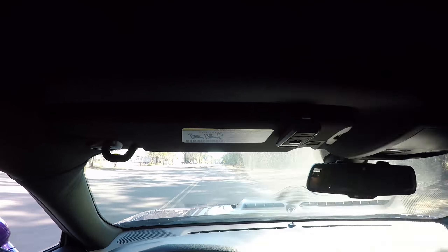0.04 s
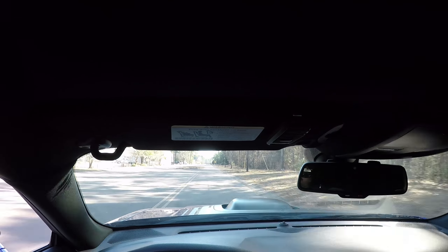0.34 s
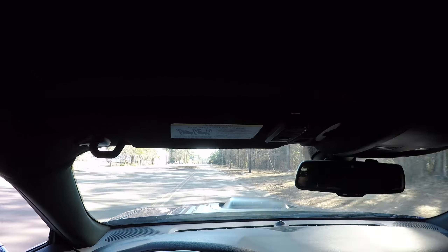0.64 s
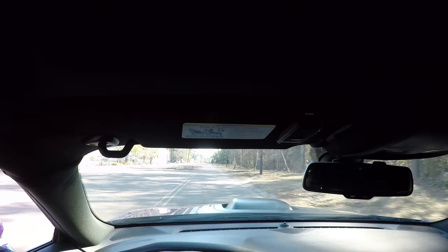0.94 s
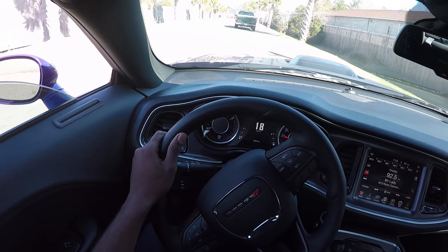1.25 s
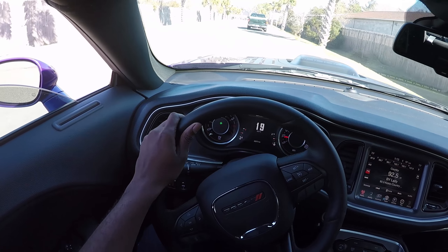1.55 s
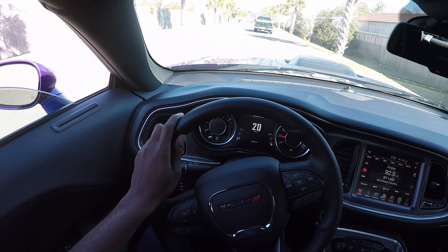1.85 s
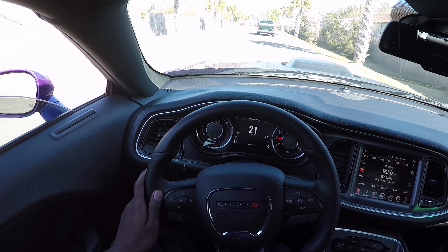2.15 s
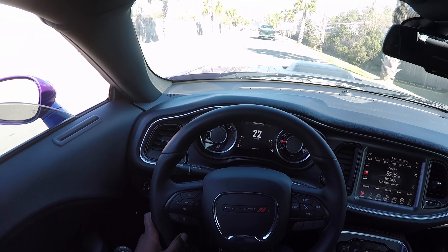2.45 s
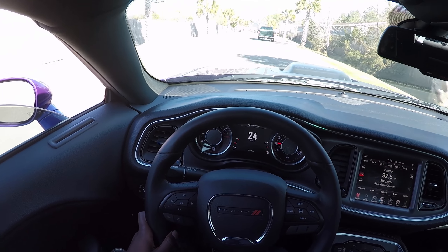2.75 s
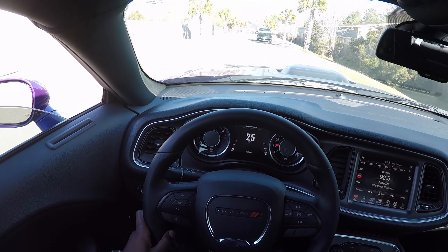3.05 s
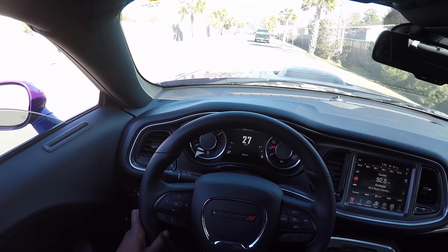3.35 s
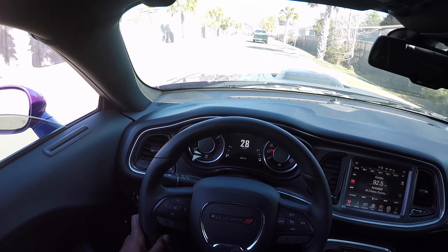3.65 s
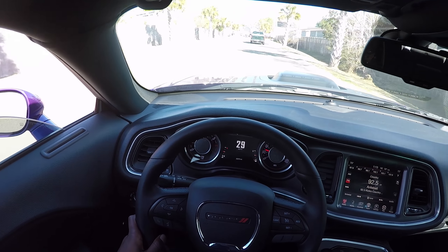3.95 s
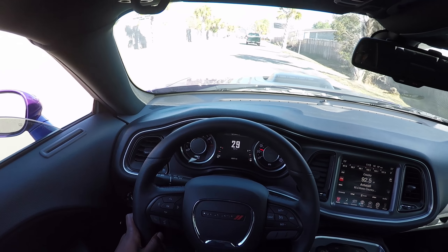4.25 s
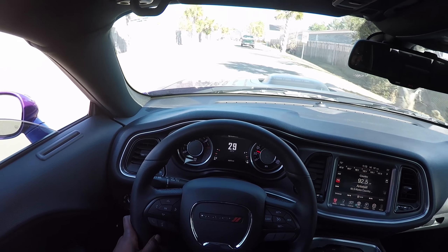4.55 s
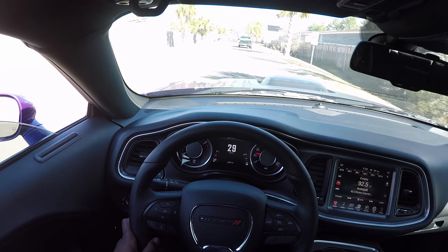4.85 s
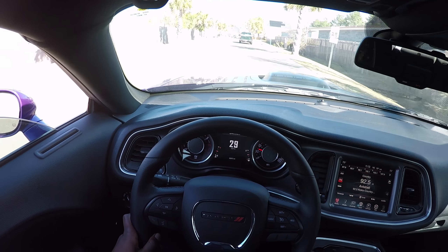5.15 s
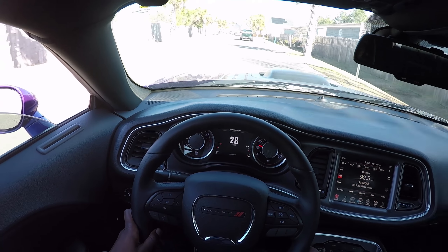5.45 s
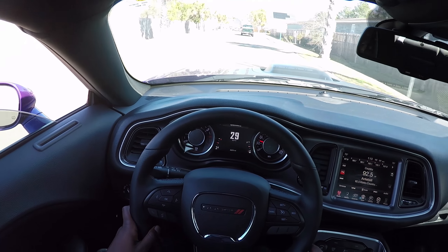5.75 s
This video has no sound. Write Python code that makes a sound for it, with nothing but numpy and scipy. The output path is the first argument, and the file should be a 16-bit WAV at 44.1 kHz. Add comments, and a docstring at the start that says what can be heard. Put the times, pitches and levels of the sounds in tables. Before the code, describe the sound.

A loud V8 car heard from inside cruises, then after an abrupt cut accelerates with a booming growl, eases off, shifts up and drones on.

```python
"""A loud V8 car booms and growls, heard from inside. It cruises on a coarse road; then, after an
abrupt cut, it pulls from low revs, lifts off, shifts up and drones on. The firing cylinders make a
boom that swells as it passes the cabin's resonances (pitches at which the cabin rings). Uneven
firing in the two cylinder banks adds burble and growl. Gas rasps in the pipes and the intake, the
exhaust sputters with the throttle shut, tyres rumble and bits of trim tick."""
import sys
import numpy as np
from scipy import signal
from scipy.fft import rfft, irfft
from scipy.io import wavfile
from scipy.ndimage import uniform_filter1d

SR = 44100
rng = np.random.default_rng(int(sys.argv[2]) if len(sys.argv) > 2 else 0)


def put_to_file(sound):
    """Save the sound as 16-bit audio at rate SR, in the file named by the first command-line argument."""
    columns = np.atleast_2d(sound).T  # one column per channel
    safe = np.clip(columns, -1, 1)
    whole_steps = np.round(safe * 32767)
    wavfile.write(sys.argv[1], SR, whole_steps.astype(np.int16))


N = 260190
TIME, BINS = np.arange(N) / SR, np.fft.rfftfreq(N, 1 / SR)  # each sample [s], each frequency [Hz]
CUT_S = 1.114  # the cruise ends here
LOW_SPEED = 17.2  # low revs [cycles/s]; in one cycle all eight cylinders fire once

# engine speed: (time [s], speed [cycles/s])
SPEED = [(1.12, 14.93), (1.3, 15.1), (1.95, 17.2), (2.6, 19.72), (2.97, 21.15), (3.35, 22.5), (3.56, 23.35),
         (3.76, 23.55), (3.87, 23.95), (3.99, 23.76), (4.32, 21.4), (4.52, 19.3), (4.83, 15.75),
         (5.0, 15.55), (5.12, 16.45), (5.3, 16.75), (5.46, 16.22), (5.89, 16.78)]
# cabin and pipe resonances: (pitch [Hz], width [Hz], boost [dB])
PIPE_PEAKS = [(195.5, 24, 4), (227, 16, -9), (365, 20, -2), (386, 8, -5.5), (458, 49, 2), (490, 17, 2),
              (572, 43, 9.5), (654.6, 29, 7), (1227, 17, 6.5), (1990, 130, 4.5), (3600, 220, 2.5)]
# how the pipes ring with the throttle shut: (pitch [Hz], width [Hz], boost [dB])
COAST_PEAKS = [(115, 8, 4), (238, 18, 9), (306, 16, 7), (372, 20, 5)]


def exhaust(speed, cycles, overtones_db=1.58):
    """Eight firings a cycle make the boom; uneven spacing in each bank adds the other tones."""
    # a tone's order is its pitch divided by the engine speed
    # tone strengths: (order, light throttle [dB], pulling hard [dB], coasting [dB])
    orders = [(3, 1.5, 7.5, 9), (4, -15, 3, -11.5), (5, -2, -13, -2), (6, 4.5, 6.5, 6.5), (7, 0, 2.5, 3),
              (9, 3.5, 15.5, 9), (10, 1, 13.5, 6), (11, 10, 6.5, -2), (12, 2, 7.5, 1.5), (13, 6.5, -0.5, 6),
              (14, 6.5, 12, 6.5), (15, 4, 8.5, 1), (16, 7, 9.5, 4), (17, 8.5, 5.5, -4.5), (18, 2, 5, 1.5),
              (19, 9, 7, 6)]
    # the highest tones, one strength for any throttle: (order, strength [dB])
    upper_orders = [(20, 3.5), (21, -2), (22, 7), (23, 5.5), (24, 0), (25, -1), (26, 2.5), (27, -5),
                    (28, -5.5), (29, -4.0), (30, -0.5), (31, -5.5), (32, -2.5)]
    # relative levels of the tones: (time [s], burble below order 13 [dB], growl from 13 up [dB])
    group_levels = [(1.15, -54.5, -50), (1.6, -57.5, -52), (2.15, -53, -47.5), (2.45, -48, -45.5),
                    (2.75, -48.5, -44.5), (3.05, -49.5, -41), (3.3, -44.5, -40), (3.72, -48.5, -37.5),
                    (3.92, -47.5, -52), (4.12, -46, -42.5), (4.35, -45, -49), (4.6, -45.5, -49),
                    (4.95, -54, -50.5), (5.2, -52, -58), (5.45, -54, -50.5), (5.75, -57, -45.5)]
    # cabin resonances that lift the boom: (pitch [Hz], width [Hz], boost [dB])
    boom_peaks = [(129, 86, 13.5), (173.7, 4.9, 5.5), (187.6, 7.9, 9.5)]
    # the boom dips and swells as the revs peak and fall, then sinks at the gear change:
    # (time [s], change [dB])
    boom_dips = [(3.7, 1), (3.81, -4.5), (3.95, 1.5), (4.1, -4), (4.3, 1), (4.42, -5), (4.55, -2.5),
                 (4.72, -5), (4.9, 0.5), (5.03, 0), (5.13, -9.5), (5.9, 0)]
    boom_db = engine_level(light_db=-34, pull_db=-4.5, coast_db=-2.5)
    boom_db += resonance_db(boom_peaks, 8 * speed) + curves(boom_dips)[0]
    boom_flutter = 0.0085 + 0.012 * np.maximum(speed - LOW_SPEED, 0)  # more at high revs
    out = amp(boom_db) * engine_tone(cycles, order=8, depth=boom_flutter).real
    pull, coast = load()
    burble_db, growl_db = curves(group_levels)
    for order, light, hard, shut in list(orders) + [(k, db, db, db) for k, db in upper_orders]:
        hz = order * speed
        group_db, flutter = (burble_db, 0.24) if order < 13 else (growl_db, 0.2)
        flutter = flutter + 0.08 * (1 - pull)  # fuel burns more steadily when pulling
        coast_db = shut - light + resonance_db(COAST_PEAKS, hz)
        throttle_db = light + pull * (hard - light) + coast * coast_db
        # each tone swells and fades as the revs carry it through the resonances
        tone = cabin_response(hz) * engine_tone(cycles, order, flutter)
        out += amp(overtones_db + group_db + throttle_db) * tone.real
    right_ear = np.roll(out, 7)  # 7 samples later than the left
    return place(np.array([out, right_ear]), left_db=.7)


def engine_tone(cycles, order, depth):
    """One tone, fluttering in strength and phase; its real part is the sound."""
    flutter = 1 + depth * (wander(rate_hz=3) + 1j * wander(rate_hz=3))
    same_power = np.sqrt(2 / (1 + 2 * depth ** 2))
    return same_power * flutter * np.exp(2j * np.pi * (order * cycles + rng.random()))


def cruise(drone_hz=121.3, between_db=-35, rumble_db=-26, tyres_db=-41):
    """A lumpy exhaust drone swells amid the rumble and roar of tyres on coarse asphalt."""
    # swells of the drone: (middle [s], half length [s], level [dB])
    surges = [(0.087, 0.026, -23.5), (0.257, 0.036, -27.5), (0.523, 0.071, -28), (0.735, 0.045, -35),
              (1.057, 0.031, -25)]
    # tone colour of the rumble: (frequency [Hz], relative level [dB])
    rumble_spectrum = [(10, -18), (22, 6.5), (40, 1), (75, 1), (115, -1.5), (157, -7), (190, -0.5),
                       (230, -13), (310, -10.5), (400, -21), (520, -26.5), (900, -76.5)]
    # tone colour of the tyre roar: (frequency [Hz], relative level [dB])
    tyre_spectrum = [(260, -7.5), (400, 3), (520, -3), (800, -0.5), (1100, -5.5), (1400, -12.5),
                     (1700, -10.5), (2000, -19), (2400, -19), (3000, -27.5), (4400, -32), (6600, -30.5),
                     (8200, -44), (10300, -46.5), (12000, -71)]
    # tyre and body resonances: (pitch [Hz], width [Hz], boost [dB])
    tyre_peaks = [(655, 24, 7.5), (892, 54, 7), (1357, 200, 8), (2190, 180, 5)]
    turns = np.cumsum(drone_hz + 4 * wander(rate_hz=14)) / SR
    lumps = unit(1 + .3 * wander(rate_hz=16))
    swells = sum(amp(db) * np.exp(-2 * ((TIME - s) / half) ** 2) for s, half, db in surges)
    drone = (amp(between_db) + swells) * lumps * np.sqrt(2) * np.sin(2 * np.pi * turns)
    tyres = amp(tyres_db + wander(rate_hz=22)) * noise(tyre_spectrum, tyre_peaks)
    return place(drone, left_db=2) + amp(rumble_db) * noise(rumble_spectrum) + tyres


def sputter(cycles, spread_db=4, low_hz=170, high_hz=480):
    """With the throttle shut, firings of very uneven strength thud through pipes and cabin."""
    # loudness of the misfiring: (time [s], level [dB])
    levels = [(3.7, -61.5), (3.82, -39), (3.96, -47), (4.07, -39), (4.36, -36), (4.5, -45), (4.75, -44),
              (5.0, -48), (5.12, -55)]
    fires = np.diff(np.floor(8 * cycles), prepend=0) > 0
    strength = amp(spread_db * np.clip(rng.standard_normal(N), -2, 2))
    pulses = fires * (strength - strength.mean())
    band = BINS ** 2 / (BINS ** 2 + low_hz ** 2) / (1 + (BINS / high_hz) ** 6)
    ringing = amp(resonance_db(COAST_PEAKS, BINS)) * cabin_response(BINS)
    thuds = unit(irfft(rfft(pulses) * band * ringing, N))
    return place(amp(curves(levels)[0]) * thuds, left_db=-1)


def pipe_rasp(cycles):
    """Gas leaves the pipes in puffs, one a firing; when pulling, more of it repeats every cycle."""
    # loudness of the gas flow: (time [s], level [dB])
    levels = [(1.15, -46.5), (1.85, -47.5), (2.27, -45.5), (2.5, -45.5), (2.75, -41), (3.15, -39.5),
              (3.4, -42), (3.62, -39), (3.95, -44.5), (4.25, -42), (4.5, -44), (5.25, -46.5), (5.85, -44.5)]
    # its tone colour: (frequency [Hz], relative level [dB])
    spectrum = [(100, -26.5), (200, -6.5), (330, 6), (450, 2), (560, -7.5), (780, -1.5), (1050, -6.5),
                (1300, -9.5), (1650, -14.5), (2100, -22), (2800, -28), (4000, -33), (6000, -51.5),
                (9000, -56.5)]
    one_cycle = rng.standard_normal((2, 2048))
    repeating = unit(np.array([np.interp(cycles % 1, np.arange(2048) / 2048, c) for c in one_cycle]))
    share = .06 + .45 * load()[0]
    gas = np.sqrt(share) * repeating + np.sqrt(1 - share) * rng.standard_normal((2, N))
    puffs = unit(1 + .17 * np.cos(2 * np.pi * 8 * cycles))
    return amp(curves(levels)[0]) * puffs * colour(gas, spectrum, PIPE_PEAKS)


def intake(cycles, depth=.22):
    """Air is gulped past the open throttle, once for each cylinder."""
    # the rasp as the throttle opens: (time [s], level [dB])
    levels = [(2.1, -85), (2.28, -55), (2.36, -64), (2.45, -60), (2.55, -62), (2.68, -53), (2.9, -57.5),
              (3.2, -57), (3.4, -65.5), (3.68, -55), (3.85, -84.5)]
    # its tone colour: (frequency [Hz], relative level [dB])
    spectrum = [(700, -26), (1300, 4.5), (1900, -5.5), (2400, -9.5), (2900, -9.5), (3500, -13),
                (5000, -27.5), (9000, -61)]
    gulps = unit(1 + depth * np.cos(2 * np.pi * 8 * cycles))
    return amp(curves(levels)[0]) * gulps * noise(spectrum)


def road(rumble_boost_db=2):
    """The body rumbles over the road; air hisses round the cabin, more as the revs rise."""
    # loudness of the rumble: (time [s], relative level [dB])
    levels = [(1.15, -48), (1.55, -49), (2.25, -39.5), (2.75, -30.5), (3.1, -31.5), (3.4, -38),
              (3.8, -37.5), (4.2, -32), (4.48, -35.5), (5.1, -35), (5.35, -33), (5.9, -32.5)]
    # tone colour of the rumble: (frequency [Hz], relative level [dB])
    rumble_spectrum = [(10, -7.5), (20, 3), (40, 11.5), (60, -0.5), (85, 2.5), (120, 1), (200, -4),
                       (300, -8), (420, -20), (700, -70.5)]
    # tone colour of the hiss: (frequency [Hz], relative level [dB])
    hiss_spectrum = [(1000, -15.5), (2500, -0.5), (3100, -4.5), (3600, -0.5), (4800, -5.5), (6400, -6),
                     (7300, -10.5), (8200, -15.5), (10500, -21.5), (12000, -51.5), (16000, -78)]
    rumble = amp(curves(levels)[0] + rumble_boost_db) * noise(rumble_spectrum)
    hiss_db = engine_level(light_db=-68, pull_db=-1.6, coast_db=-2.5, db_per_speed=0.5)
    return rumble + amp(hiss_db) * noise(hiss_spectrum)


def trim_ticks(ring_width_hz=400, rise_s=0.0023, fade_60db_s=0.044):
    """Small hard parts chatter: a short bright ring mixed with a broad clack."""
    # the ticks: (time [s], relative level [dB], ring pitch [Hz], share of clack [0-1])
    ticks = [(1.216, -43.5, 5270, 0.25), (1.248, -52.5, 3960, 0.4), (1.371, -53.5, 5890, 0.03),
             (1.548, -55.5, 5370, 0.8), (1.894, -45.5, 5400, 0.1), (1.998, -42.5, 6230, 0.6),
             (2.009, -44, 6300, .9), (2.038, -48, 5470, 0.9), (2.065, -52, 6250, 1),
             (2.084, -53.5, 6020, 0.7), (2.112, -55, 6600, 0.8), (4.129, -52.5, 5470, 0.1),
             (4.223, -53, 5950, 0.05), (4.317, -53.5, 6240, 0.5), (4.918, -62, 4880, .3)]
    # tone colour of the clack: (frequency [Hz], relative level [dB])
    clack_spectrum = [(800, -17.5), (2400, 2), (3700, -2), (4500, -3), (6500, -5.5), (8200, -21),
                      (12000, -26), (15000, -53)]
    # resonances of the trim: (pitch [Hz], width [Hz], boost [dB])
    clack_peaks = [(2600, 300, 3), (3700, 350, 4.6), (5160, 370, 6.1), (6200, 320, 3.8)]
    out, size = np.zeros((2, N)), SR // 5
    clack = noise(clack_spectrum, clack_peaks)
    t, hz = np.arange(size) / SR, np.fft.rfftfreq(size, 1 / SR)
    fade = (1 - np.exp(-t / rise_s)) * amp(-60 * t / fade_60db_s)
    for s, db, ring_hz, share in ticks:
        at = slice(round(s * SR), round(s * SR) + size)
        band = 1 / (1 + (2 * (hz - ring_hz) / ring_width_hz) ** 2)
        ring = unit(irfft(rfft(rng.standard_normal((2, size))) * band, size))
        tick = np.sqrt(1 - share) * ring + np.sqrt(share) * clack[:, at]
        out[:, at] += place(amp(db) * fade * tick, left_db=-1.5)
    return out


def cut_click(step_db=-18, settle_s=0.0015):
    """A click at the cut: a small step that settles at once."""
    return amp(step_db) * (TIME >= CUT_S) * np.exp(-abs(TIME - CUT_S) / settle_s)


def load():
    """How hard the engine pulls and how far it coasts, each 0-1."""
    # the pedal: (time [s], throttle [-1 coasting, 0 light, 1 pulling hard])
    pedal = [(1.1, -0.16), (1.95, 0.12), (2.3, 0.79), (3.7, 0.63), (3.9, -0.48), (4.75, -0.93), (5.1, -1.3),
             (5.6, -0.37), (5.9, 0.35)]
    throttle = np.clip(curves(pedal)[0], -1, 1)
    return np.maximum(throttle, 0), np.maximum(-throttle, 0)


def engine_level(light_db, pull_db, coast_db, db_per_speed=0):
    """A level in dB: its value at light throttle, shifted by pulling, coasting and revs."""
    pull, coast = load()
    return light_db + pull_db * pull + coast_db * coast + db_per_speed * (curves(SPEED)[0] - LOW_SPEED)


def cabin_response(hz, ripple_db=2.5):
    """How pipes and cabin change a tone's strength and phase (wave timing), as a complex gain."""
    # their peaks and notches: (frequency [Hz], gain [dB])
    gains = [(50.0, -18.5), (70.0, 4), (85.0, 9), (100.0, 5), (118.0, 9.5), (135.0, 7), (150.0, 4.5),
             (165.0, 6), (182.0, 0), (200.0, 7), (218.0, -3), (236.0, -1.5), (252.0, -0.5), (268.0, -3),
             (288.0, -6), (312.0, -6.0), (332.0, -11.5), (352.0, -6.5), (367.0, -15.5), (378.0, -14.5),
             (396.0, -17.5), (415.0, -10.5), (432.0, -24), (457.0, -10.5), (490.0, -23), (545.0, -19),
             (578.0, -11.5), (620.0, -22), (655.0, -16.5), (780.0, -24)]
    grid_hz = np.arange(1025)
    # random ripples stand for the many small cabin resonances above the boom
    bumps = np.clip(rng.standard_normal(len(grid_hz[::16])), -1.5, 1.5)
    ripple = np.interp(grid_hz, grid_hz[::16], bumps) * np.interp(grid_hz, [200, 300], [0, 1])
    db = read(gains, grid_hz) + ripple_db * ripple
    mirrored = np.log(amp(np.r_[db, db[-2:0:-1]]))
    phase = -signal.hilbert(mirrored).imag[:len(grid_hz)]  # turns at every peak and notch
    return np.interp(hz, grid_hz, amp(db) * np.exp(1j * phase))


def colour(pair, spectrum, peaks=()):
    """Two white noises become cabin sound: alike at both ears in the bass, spread out in the treble."""
    # how alike the ears are: (frequency [Hz], likeness [0-1])
    likeness = [(30, .94), (125, .97), (300, .975), (450, .8), (700, .48), (1400, .42), (3000, .25),
                (6000, .08), (10000, .5)]
    # how much louder the left ear is: (frequency [Hz], left minus right [dB])
    balance = [(30, 3.6), (80, 1.8), (160, .8), (350, .6), (700, 3.2), (1400, 4.2), (2800, 5.5), (5500, .5),
               (10000, -2.5)]
    # how far the left ear is ahead: (frequency [Hz], phase [radians])
    lead = [(30, 0), (260, -.05), (520, .3), (1200, .4), (1700, .7), (2700, 1.6), (6000, 0)]
    common, separate = rfft(pair)
    same, lean_db = np.clip(read(likeness, BINS), -1, 1), read(balance, BINS) / 2
    left = common * amp(lean_db) * np.exp(1j * read(lead, BINS))
    right = (same * common + np.sqrt(1 - same ** 2) * separate) * amp(-lean_db)
    out = irfft(np.array([left, right]) * amp(read(spectrum, BINS) + resonance_db(peaks, BINS)), N)
    return out / np.std(out.mean(0))


def noise(spectrum, peaks=()):
    """Stereo cabin noise with the given tone colour."""
    return colour(rng.standard_normal((2, N)), spectrum, peaks)


def resonance_db(peaks, hz):
    """The boost that a set of resonances gives at hz."""
    return sum(db / (1 + (2 * (hz - pitch) / width) ** 2) for pitch, width, db in peaks)


def wander(rate_hz):
    """A smooth random wobble that changes about rate_hz times a second."""
    hz = np.fft.rfftfreq(2048, 1 / 256)
    slow = irfft(rfft(rng.standard_normal(2048)) / np.sqrt(1 + (hz / rate_hz) ** 6))
    return np.interp(TIME, np.arange(len(slow)) / 256, unit(slow))


def curves(rows):
    """The columns of a table, joined by lines in time."""
    times, *columns = np.transpose(rows)
    return [np.interp(TIME, times, column) for column in columns]


def read(points, hz):
    """A table's value at hz, joined by lines on a log-frequency axis."""
    frequencies, values = np.transpose(points)
    return np.interp(np.log(hz + 1), np.log(frequencies), values)


def place(x, left_db):
    """Leans a sound to one side."""
    return x * amp([[left_db / 2], [-left_db / 2]])


def amp(db):
    """Decibels to gain."""
    return 10 ** (np.asarray(db) / 20)


def unit(x):
    """Scales to an average strength (rms) of 1."""
    return x / np.sqrt(np.mean(x ** 2) + 1e-20)


def scene():
    """Cruising up to the cut, then the pull and the gear change."""
    speed = curves(SPEED)[0]
    cycles = np.cumsum(speed) / SR
    cruising = cruise()
    driving = exhaust(speed, cycles) + sputter(cycles) + pipe_rasp(cycles) + intake(cycles) + road()
    after_cut = np.clip((TIME - CUT_S) / .004 + .5, 0, 1)  # a 4 ms crossfade
    return (1 - after_cut) * cruising + after_cut * driving + trim_ticks() + cut_click()


def record(dry, ceiling_db=-14.5, release_db_per_s=60, top_hz=15800):
    """A limiter turns the loudest peaks down; then a filter removes the highest treble."""
    peak_db = 20 * np.log10(abs(dry).max(0) + 1e-9)
    fall_db = TIME * release_db_per_s
    held_db = np.maximum.accumulate(peak_db + fall_db) - fall_db
    over_db = np.maximum(held_db - ceiling_db, 0)
    smooth_db = uniform_filter1d(uniform_filter1d(over_db, size=200), size=200)
    lowpass = signal.firwin(511, top_hz, window=("kaiser", 9), fs=SR)
    return signal.oaconvolve(dry * amp(-smooth_db), lowpass[None], "same")


dry = scene()
out = record(dry)
put_to_file(out)
```